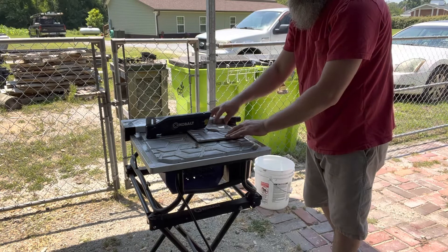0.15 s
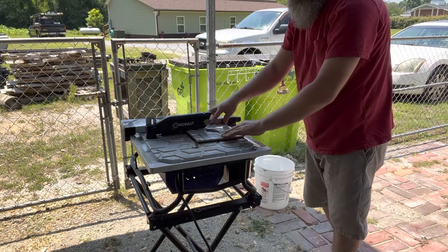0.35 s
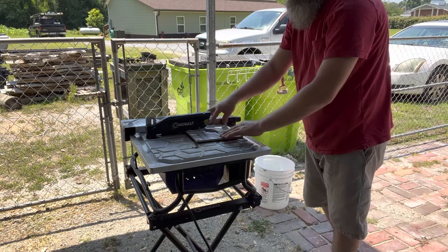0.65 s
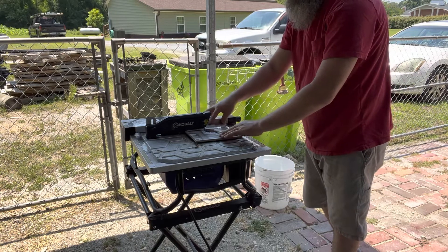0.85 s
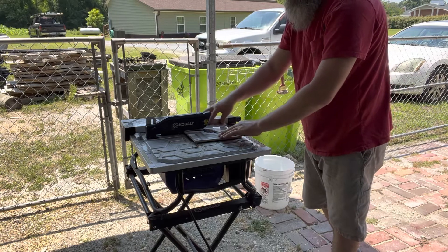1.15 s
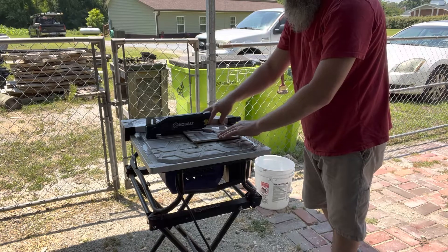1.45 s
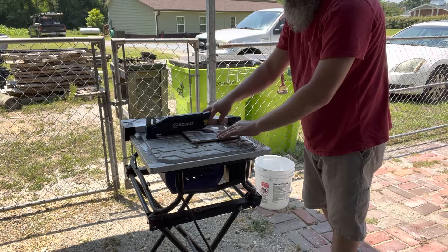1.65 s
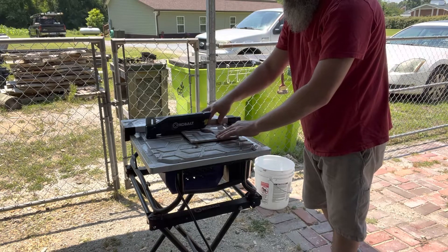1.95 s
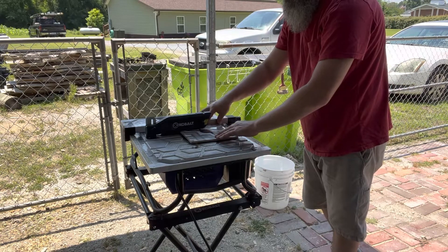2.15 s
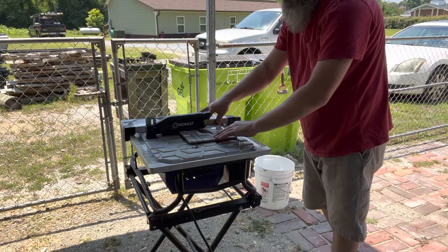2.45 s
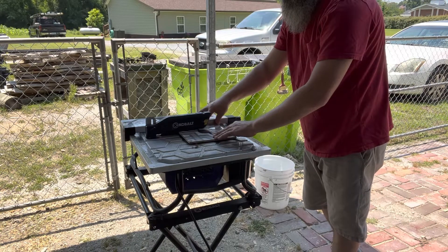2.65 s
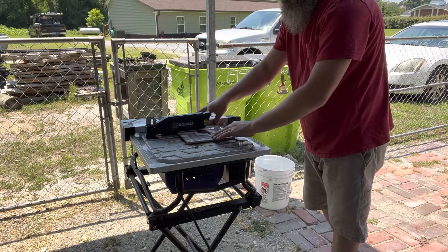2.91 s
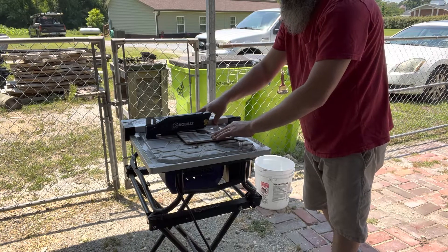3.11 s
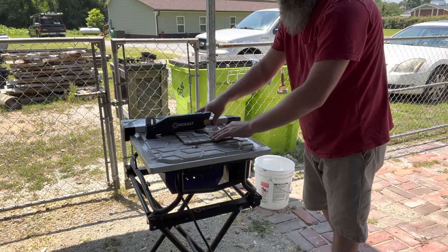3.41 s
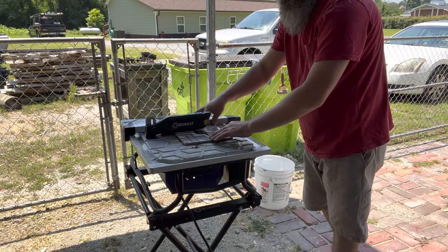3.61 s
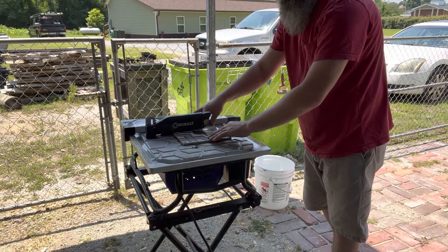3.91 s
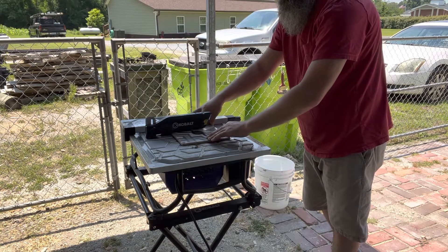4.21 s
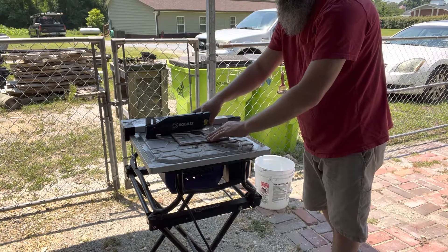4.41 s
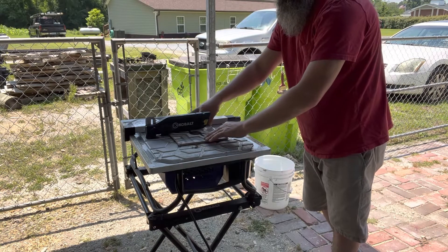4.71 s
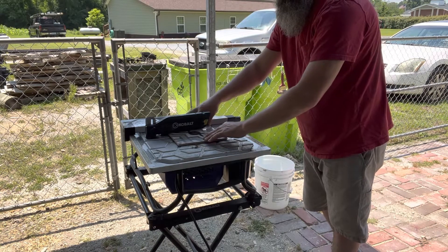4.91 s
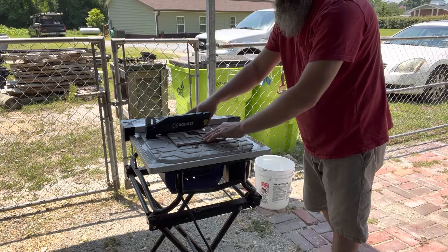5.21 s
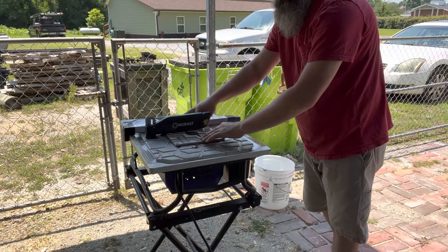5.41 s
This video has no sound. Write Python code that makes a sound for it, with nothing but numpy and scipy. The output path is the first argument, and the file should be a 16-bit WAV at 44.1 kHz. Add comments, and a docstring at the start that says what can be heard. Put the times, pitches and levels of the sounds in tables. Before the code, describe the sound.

A wet tile saw whines and grinds steadily outdoors, with short screeching bites and hissing water spray as a tile feeds deeper into the blade.

```python
"""Patio: a wet tile saw cuts a tile pushed slowly deeper into the blade.
The rough rim grinds in a pattern that repeats twice a turn: a buzz of partials shaped by tub, blade and tile.
Harder push brings more screech, with brief bites on top. Spray hisses (shaped noise) in time with the rim.
Faint motor tones (sines), outdoor rumble (shaped noise) and a far vehicle (gliding sine) in two gears."""
import sys
import numpy as np
from scipy import signal
from scipy.fft import rfft, irfft
from scipy.io import wavfile
from scipy.ndimage import uniform_filter1d, map_coordinates

SR = 44100
rng = np.random.default_rng(int(sys.argv[2]) if len(sys.argv) > 2 else 0)


def unload_wav(signal):
    """Save mono or channel-first audio to the path in sys.argv[1] as 16-bit WAV at rate SR, clipped to [-1, 1]."""
    wavfile.write(
        sys.argv[1],
        SR,
        np.round(np.clip(np.atleast_2d(signal).T, -1, 1) * 32767).astype(np.int16),
    )


N = 245195

# outdoor rumble spectrum: (frequency [Hz], relative density [dB])
RUMBLE_SPECTRUM = [(20, -31), (50, -21), (80, -11), (115, 5), (160, -2.5), (220, -3.5), (320, -1.5),
                   (600, -15.5)]
# distant vehicle, one table a gear: (time [s], exhaust [Hz], level [dB])
GEARS = [
    [(.68, 112.3, -97), (.82, 118, -74), (1.2, 132, -69), (1.35, 154.3, -71), (1.55, 172.7, -77),
     (1.7, 192, -85), (1.95, 227, -85), (2.05, 230, -100)],
    [(2.42, 179.9, -100), (2.53, 171, -79), (2.72, 156, -74), (3.13, 186, -78), (3.4, 205.6, -80),
     (3.65, 222, -80), (3.9, 235, -80)],
]
# steady motor tones: (frequency [Hz], level [dB])
MOTOR_TONES = [(400, -88), (719, -77.5), (240, -92.5)]
# spray and slurry spectrum: (frequency [Hz], relative density [dB])
SPRAY_SPECTRUM = [(200, -22), (400, -9), (650, -7), (1200, -9), (2000, -1.5), (2800, 2), (3500, 3.5),
                  (4900, 10.5), (6500, 0.5), (8500, 12), (11500, 2.5), (14000, 8.5), (15100, -8),
                  (16000, -18)]
# hollow rings stirred by the slurry: (frequency [Hz], width [Hz], level before stirring [dB])
HOLLOW_RINGS = [(591, 31, -66), (872.5, 11, -65), (3517, 60, -57.5), (2000, 920, -77)]
# stirring of the hollow rings: (time [s], gain [1])
STIRRING = [(0, 0.17), (2.3, 0.17), (2.9, 0.4), (4.6, 0.17), (5.1, 0.84), (5.56, 0.75)]
# motor sagging under load: (time [s], buzz = twice the shaft speed [Hz])
BUZZ_SPEED = [(0.0, 117.7), (0.42, 117.4), (1.18, 117.4), (2.24, 117.2), (3.2, 116.5), (4.96, 116.5),
              (5.05, 116.8), (5.56, 116.2)]
# progress of the cut: (time [s], depth [0-1])
CUT_DEPTH = [(0, 0.33), (1.9, 0.36), (2.4, 0.42), (3.0, 0.71), (3.42, 0.76), (3.52, 0.99), (4.5, 1),
             (5.56, 0.99)]
# push on the tile: (time [s], push [dB])
PUSH = [(0.0, -2), (0.12, -0.6), (1.25, -1.7), (1.8, 2.6), (2.45, 6), (2.95, 4.9), (3.2, 1), (3.6, 1.2),
        (4.6, -8), (5.56, -5)]
# rim bites harder and screeches: (time [s], length [s], strength [dB])
BITES = [(.43, 0.11, 8), (.96, .07, 8), (1.16, .07, 9), (1.39, 0.081, 7), (1.6, 0.037, 4.5),
         (1.75, 0.063, 4.5), (2.735, .03, 1), (2.81, .025, 2.5), (2.87, 0.031, 4.5), (3.03, 0.056, 5),
         (3.7, 0.033, 2.5), (3.84, 0.071, 5.5), (3.96, .03, 8), (4.07, 0.087, 4.5), (4.37, 0.088, 7),
         (4.48, 0.14, 7.5), (4.73, 0.14, 9), (5.07, .12, 1), (5.37, 0.1, 6.5)]
# tile shifts in the slot: (time [s], length [s], 7th partial [dB], 8th [dB], 15th [dB])
TILE_SHIFTS = [(.33, 0.071, -11, -4, -1), (.8, 0.38, 3.5, 2, 7), (2.52, 0.32, -9.5, -6, -21),
               (3.04, 0.13, -2, 5, 0), (3.35, 0.34, -1.5, 9.5, -8), (3.55, 0.18, -3, -8, 7.5),
               (5.4, .3, -8, 0.5, -6)]
# first contact wears off; the cut eases towards the end
ENTRY_DECAY_S, EASE_FROM_S, EASE_UNTIL_S = 0.25, 4.2, 5.04
# low partials, 2nd upwards, before register levelling: (relative level at tile edge [dB], deep [dB])
LOW_PARTIALS = [(-92, -82.5), (-64, -68), (-79.5, -62), (-72, -75.5), (-70, -61), (-58.3, -61.7),
                (-71.6, -58.4), (-71.5, -85.5), (-73.5, -76), (-77.5, -81.5), (-73, -78), (-79, -82),
                (-78, -82), (-71, -61.5), (-64, -70), (-62.5, -62), (-67.5, -67.5), (-73.5, -68),
                (-66.5, -65), (-59.5, -70), (-62.5, -64.5), (-76, -68.5), (-69, -76.5), (-55, -73),
                (-76, -70), (-60.5, -82.5), (-66, -73), (-57, -75.5), (-80, -74)]
# blade and tile resonances, shaping the partials above those:
# (frequency [Hz], width [Hz], relative level at tile edge [dB], deep [dB])
CUT_MODES = [(3519, 160, -58, -63), (3954, 114, -49.5, -68), (4392, 159, -48, -73), (4940, 198, -66, -62),
             (5260, 69, -71, -60.5), (5820, 550, -64, -71), (6180, 201, -61, -71), (6910, 840, -67.5, -70),
             (7010, 360, -66, -79.5), (8006, 500, -63, -66.5), (8250, 170, -62, -71),
             (8885, 184, -62.5, -60.5), (9610, 120, -60, -64.5), (10020, 120, -55.5, -67),
             (10200, 130, -66, -65.5), (10530, 540, -66.5, -64.5), (11320, 110, -60.5, -75),
             (11820, 970, -72, -67.5), (12500, 490, -60, -60.5), (13130, 500, -74, -58),
             (13500, 910, -68, -70), (14100, 650, -71, -64), (15040, 140, -57, -45.5),
             (15550, 220, -56, -62), (15200, 1300, -62, -68)]
# multiples of the buzz that stand out, three hum tones then the blade's ring: (order [1])
TONE_ORDERS = (7, 8, 15, 34)
# their levels: (tile edge [dB], deep [dB], entry [dB], easing [dB], push share [dB/dB], bite share [dB/dB])
TONE_LEVELS = [(-54.5, -59.5, 6.5, 4, 0.1, 0.13), (-77, -58, 15, 5, 0.14, 0.22),
               (-69, -61.5, -5, 4, -0.2, -0.074), (-53.5, -49.5, 5.5, -5.5, .7, 0.49)]
# lower edges of drone, rasp, grind, screech, sizzle, treble: (frequency [Hz])
REGISTER_EDGES_HZ = (1000, 1690, 3100, 4750, 5550, 11800)
# rasp, grind, screech, sizzle, before the drive offset:
# (tile edge [dB], deep [dB], entry [dB], easing [dB], push share [dB/dB], bite share [dB/dB])
REGISTER_LEVELS = [(-48, -52, 4, -3, -0.17, .05), (-42, -49.5, 4.5, -1, -0.22, 0.059),
                   (-49.5, -46.5, -5, 2.3, 0.91, 0.64), (-44.5, -46.5, 0.9, -2.5, -0.12, 0.049)]
# drone before offsets: (time [s], level [dB])
DRONE_LEVEL = [(0.0, -56.5), (0.43, -60.5), (0.59, -56), (1.31, -60), (1.5, -56.5), (1.95, -54.5),
               (3.33, -66), (3.96, -57.5), (4.18, -63), (5.56, -61)]
# treble before offsets: (time [s], level [dB])
TREBLE_LEVEL = [(0.0, -48.5), (1.16, -50.5), (2.28, -45.5), (2.32, -48), (3.19, -49), (3.62, -52),
                (4.09, -49.5), (5.42, -52), (5.56, -49)]
# steadiness of the partials: (frequency [Hz], looseness at depth 0 [1], share of slow fading [1])
UNSTEADINESS = [(350, .074, .04), (900, .14, .33), (1500, .3, .7), (2000, .31, .92), (3700, .36, 1),
                (4000, .38, 1), (4400, .48, 1.1), (5000, .85, 1), (6000, .95, 1.1), (15000, 1.5, .8)]
# screech: the rim catches once a cycle, a short upward sweep whose partials flutter together
SCREECH_SCATTER_RAD, SCREECH_TOGETHER, SCREECH_SWEEP_HZ_PER_S = .35, .5, 130000
# between the two microphones: (frequency [Hz], left-right [dB], left lead [rad], likeness [0-1])
PORTS = [(100, -0.6, -0.09, 0.94), (240, -0.5, -0.05, 0.9), (400, -1.1, -0.11, 0.991),
         (800, -0.8, 0.18, 0.86), (1300, -3.9, 0.34, 0.675), (1800, -0.7, -0.09, 0.894),
         (2500, 0.5, -0.04, 0.956), (3500, -0.3, 0.08, 0.953), (4500, -0.3, -0.01, 0.94),
         (6500, -0.6, -0.15, 0.768), (8500, -2.7, 0.04, 0.792), (10500, -2.3, 0.12, 0.621),
         (12500, -5.6, -0.58, 0.522), (14000, -5.5, -1.39, 0.599), (15300, -5.1, -1.13, 0.79)]
CUTOFF_HZ = 15750


def from_db(db):
    """Decibels to gain."""
    return 10 ** (np.asarray(db) / 20)


def rms_one(x):
    """Scale to unit rms."""
    return x / np.sqrt(np.mean(np.abs(x) ** 2) + 1e-20)


def in_time(rows, t):
    """Columns of a curve at the times t."""
    time_s, *columns = np.transpose(rows)
    return [np.interp(t, time_s, c) for c in columns]


def at_hz(points, hz, axis=1):
    """One column of a spectrum, read on a log-frequency axis."""
    columns = np.transpose(points)
    return np.interp(np.log(hz + 1), np.log(columns[0] + 1), columns[axis])


def resonance(hz, centre_hz, width_hz):
    """Resonance gain with steep skirts: 1 on top, half at the edges of its width."""
    return 1 / (1 + (2 * (hz - centre_hz) / width_hz) ** 2)


def noise(gain):
    """Unit-rms noise coloured by a gain for each frequency."""
    return rms_one(irfft(rfft(rng.standard_normal(N)) * gain, N))


def wander(shape, rate_hz, cycle_hz):
    """Low-passed complex chance, one value per row and cycle; unit rms."""
    pole = np.exp(-2 * np.pi * rate_hz / cycle_hz)
    rows, cycles = shape
    white = rng.standard_normal((rows, 2 * cycles, 2)) @ [1, 1j]
    smooth = signal.lfilter([1], [1, -2 * pole, pole * pole], white)
    return rms_one(smooth[:, cycles:])  # filter settles over the first half


def bumps(rows, t):
    """Rounded swells (time, length, dB, ..), summed for each dB column."""
    time_s, length_s, *db = np.transpose(rows)
    offset = 2 * (t - time_s[:, None]) / length_s[:, None]
    return np.array(db) @ .5 ** (offset ** 2)


def cut_depth(t):
    """Depth of the cut, 0-1."""
    return in_time(CUT_DEPTH, t)[0]


def driven(rows, t):
    """Level in dB of each row, driven by depth, first contact, easing, push and bites."""
    depth = np.clip(cut_depth(t), 0, 1)
    entry = np.exp(-t / ENTRY_DECAY_S)
    easing = np.interp(t, [EASE_FROM_S, EASE_UNTIL_S], [0, 1])
    return np.array(rows) @ [1 - depth, depth, entry, easing, in_time(PUSH, t)[0], bumps(BITES, t)[0]]


def rumble(hz, level_db=-75.0):
    """Steady outdoor rumble: noise weighted to the low frequencies."""
    return from_db(level_db) * noise(from_db(at_hz(RUMBLE_SPECTRUM, hz)))


def vehicle(t):
    """Only the exhaust's lowest note carries; it climbs in 1st gear, dips then climbs in 2nd."""
    out = np.zeros(N)
    for gear in GEARS:
        exhaust_hz, db = in_time(gear, t)
        note = np.sqrt(2) * np.sin(2 * np.pi * np.cumsum(exhaust_hz) / SR)
        out += from_db(db) * note * (t > gear[0][0]) * (t < gear[-1][0])
    return out


def motor(t):
    """Faint steady tones of the motor, at random phases."""
    return sum(from_db(db) * np.sqrt(2) * np.sin(2 * np.pi * (tone_hz * t + rng.random()))
               for tone_hz, db in MOTOR_TONES)


def spray(t, hz, cycles, spray_db=-52, throb=0.33, deep_db=0.5):
    """Water flung off the rim hisses in time with it; slurry stirs hollow rings."""
    coarse_t = t[::200]
    sizzle_db = np.interp(t, coarse_t, driven(REGISTER_LEVELS, coarse_t)[-1])
    # flow partly follows the sizzle register
    flow_db = spray_db + deep_db * cut_depth(t) + 0.29 * (sizzle_db - sizzle_db.mean())
    throbbing = 1 + throb * np.cos(2 * np.pi * cycles)
    hiss = from_db(flow_db) * noise(from_db(at_hz(SPRAY_SPECTRUM, hz))) * throbbing
    hollow = sum(from_db(db) * noise(resonance(hz, centre_hz, width_hz))
                 for centre_hz, width_hz, db in HOLLOW_RINGS)
    return hiss + hollow * in_time(STIRRING, t)[0]


def screeching(hz):
    """Which partials lie in the screech register."""
    return (hz > REGISTER_EDGES_HZ[3]) & (hz < REGISTER_EDGES_HZ[4])


def register_levels(t, cycle_hz, drone_db=1.0, treble_db=4.0, treble_bite=.25, flicker_db=1.23,
                    flicker_rate_hz=4):
    """Level in dB of the six grinding registers; each flickers a little on its own."""
    drone = in_time(DRONE_LEVEL, t)[0] + drone_db
    treble = in_time(TREBLE_LEVEL, t)[0] + treble_db + treble_bite * bumps(BITES, t)[0]
    db = np.vstack([drone, driven(REGISTER_LEVELS, t), treble])
    return db + flicker_db * wander(db.shape, flicker_rate_hz, cycle_hz).real


def cut_spectrum(hz, depth):
    """Partials before fading and levelling: listed low ones, then modes ringing, edge to deep."""
    low_db = np.transpose(LOW_PARTIALS)
    centre_hz, width_hz, *mode_db = np.transpose(CUT_MODES)
    ringing = [np.linalg.norm(from_db(db) * resonance(hz, centre_hz, width_hz), axis=1) for db in mode_db]
    edge, deep = [np.r_[from_db(low), high[len(low):]][:, None] for low, high in zip(low_db, ringing)]
    return np.sqrt(2) * edge ** (1 - depth) * deep ** depth


def partial_levels(t, cycle_hz, order, drift_db=4.0, drift_rate_hz=0.53, drive_db=-3.0):
    """Level of every partial (rows) at the times t (columns): cut spectrum, fading, registers, tones."""
    hz = order * cycle_hz
    level = cut_spectrum(hz, np.clip(cut_depth(t), 0, 1))
    # as the contact point moves along the tile, neighbouring partials fade and return together
    fading = rms_one(uniform_filter1d(wander(level.shape, drift_rate_hz, cycle_hz).real, 2, axis=0))
    # they can sink deep but hardly rise
    level = level * from_db(drift_db * np.minimum(fading, .9) * at_hz(UNSTEADINESS, hz, axis=2))
    # partials below the drone keep their level; prominent tones follow their own rule
    register = np.digitize(hz[:, 0], REGISTER_EDGES_HZ)
    prominent = np.isin(order[:, 0], TONE_ORDERS)
    for k, register_db in enumerate(register_levels(t, cycle_hz)):
        inside = (register == k + 1) & ~prominent
        level[inside] *= from_db(register_db + drive_db) / np.linalg.norm(level[inside], axis=0)
    tones_db = driven(TONE_LEVELS, t)
    tones_db[:-1] += bumps(TILE_SHIFTS, t)
    level[prominent] = from_db(tones_db)
    return level


def rim_pattern(hz, depth, edge_scatter_rad=1.0, deep_scatter_rad=1.79, smear_s=.0012):
    """Partial phases: at the edge the rim knocks once a cycle, deep in the slot it rubs all round."""
    scatter = edge_scatter_rad + (deep_scatter_rad - edge_scatter_rad) * depth
    scatter = scatter + np.interp(hz, [5000, 8000], [0, .9])
    scatter = np.where(screeching(hz), SCREECH_SCATTER_RAD, scatter)
    # the knock is smeared into a short upward chirp, smear_s late at 5 kHz
    chirp = np.pi * smear_s * hz ** 2 / 5000
    sweep = np.pi * (hz - REGISTER_EDGES_HZ[3]) ** 2 / SCREECH_SWEEP_HZ_PER_S
    chirp = np.where(screeching(hz), sweep, chirp)
    return np.exp(1j * (scatter * rng.standard_normal(hz.shape) - chirp))


def unsteadiness(hz, depth, cycle_hz, wear=0.55, flutter=0.74, grit=0.43, flutter_rate_hz=17,
                 catch=0.49, catch_rate_hz=25):
    """Complex gain of each partial and cycle; high partials and a deep cut are the least steady."""
    loose = at_hz(UNSTEADINESS, hz) * (1 + .5 * depth)
    shape = loose.shape
    chance = sum(share * wander(shape, rate_hz, cycle_hz)
                 for share, rate_hz in [(wear, 1.5), (flutter, flutter_rate_hz), (grit, 90)])
    together = SCREECH_TOGETHER * screeching(hz)
    shared = catch * wander((1, shape[1]), catch_rate_hz, cycle_hz)
    chance = np.sqrt(1 - together) * chance + np.sqrt(together) * shared
    return (1 + loose * chance) / np.sqrt(1 + loose ** 2 * (wear ** 2 + flutter ** 2 + grit ** 2))


def blade(t, speed_hz, cycles, size=2048):
    """Rim pattern as one waveform a cycle (half a turn), crossfaded as the cut moves on."""
    when = np.interp(np.arange(int(cycles[-1]) + 2), cycles, t)
    order = np.arange(2, int(CUTOFF_HZ / speed_hz.min()) + 1)[:, None]
    cycle_hz = speed_hz.mean()
    hz, depth = order * cycle_hz, cut_depth(when)
    level = partial_levels(when, cycle_hz, order)
    partials = level * rim_pattern(hz, depth) * unsteadiness(hz, depth, cycle_hz)
    # two empty rows: DC and the fundamental
    waves = irfft(np.pad(partials, ((2, 0), (0, 0))), size, axis=0) * size / np.sqrt(2)
    wrapped = np.vstack([waves, waves[:1]])
    return map_coordinates(wrapped, [cycles % 1 * size, cycles], order=1)


def patio(t, hz):
    """Street far behind and saw close by, as they arrive along one path."""
    speed_hz = in_time(BUZZ_SPEED, t)[0]
    cycles = np.cumsum(speed_hz) / SR
    street = rumble(hz) + vehicle(t)
    return street + motor(t) + spray(t, hz, cycles) + blade(t, speed_hz, cycles)


def microphones(direct, scattered, hz, scatter_db=-2.5):
    """Two ports at different angles; sound scattered off paving and fence sets them apart."""
    skew = from_db(at_hz(PORTS, hz, axis=1) / 2) * np.exp(.5j * at_hz(PORTS, hz, axis=2))
    ports = np.array([skew, 1 / skew]) / np.abs((skew + 1 / skew) / 2)
    alike = np.clip(at_hz(PORTS, hz, axis=3), 0, 1)
    side = from_db(scatter_db) * np.sqrt((1 - alike) / (1 + alike))
    # scattered sound enters the two ports in opposite sign
    return irfft(ports * rfft(direct) + side * rfft(scattered) * [[1], [-1]], N)


def scene():
    """Direct sound and a scattered copy with its own random draws."""
    t = np.arange(N) / SR
    hz = np.arange(N // 2 + 1) * SR / N
    return microphones(patio(t, hz), patio(t, hz), hz)


def record(dry):
    """Steep low-pass at the cutoff."""
    lowpass = signal.ellip(12, .1, 90, CUTOFF_HZ, fs=SR, output="sos")
    return signal.sosfilt(lowpass, dry)


dry = scene()
out = record(dry)
unload_wav(out)
```